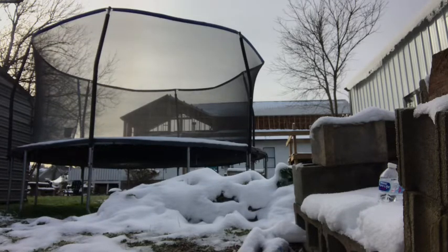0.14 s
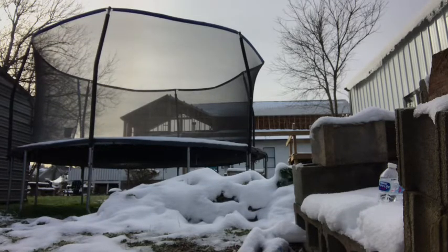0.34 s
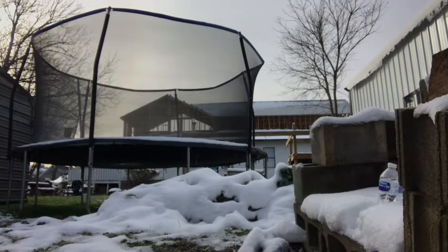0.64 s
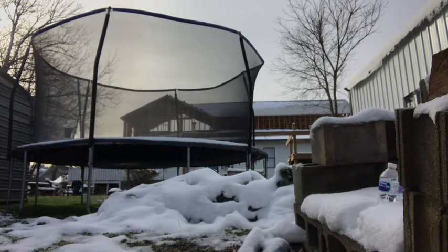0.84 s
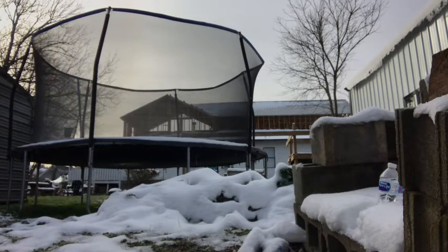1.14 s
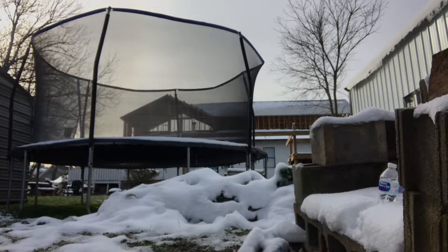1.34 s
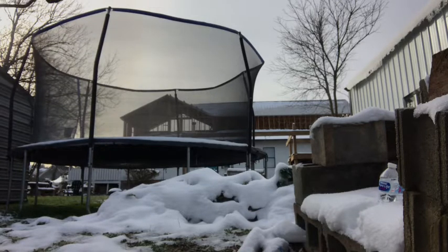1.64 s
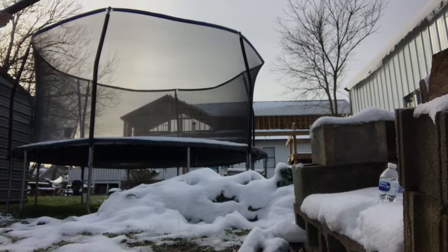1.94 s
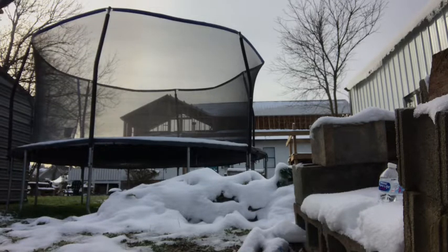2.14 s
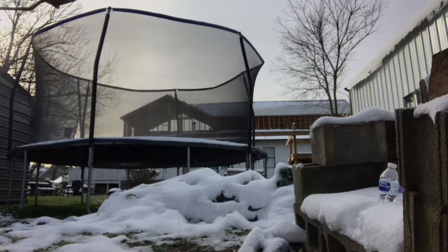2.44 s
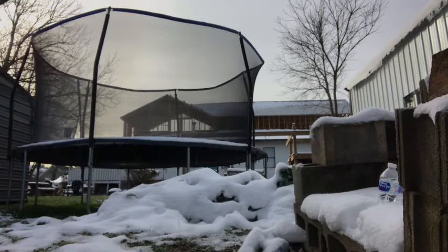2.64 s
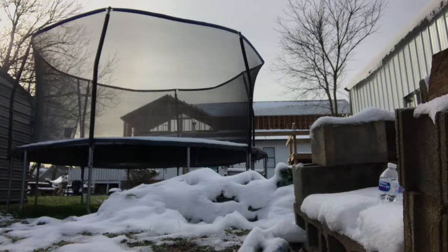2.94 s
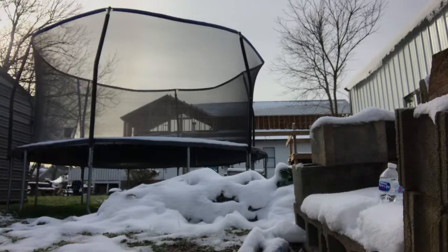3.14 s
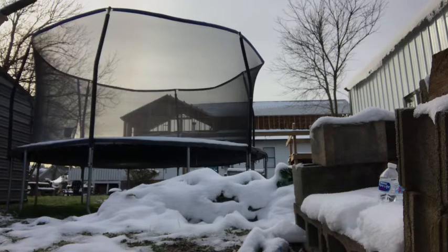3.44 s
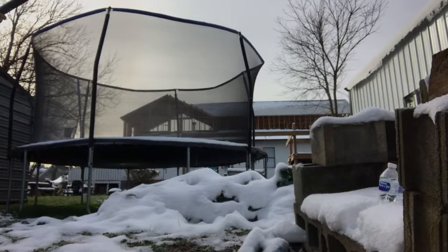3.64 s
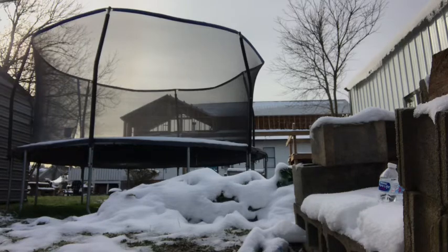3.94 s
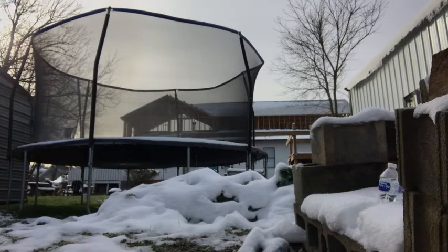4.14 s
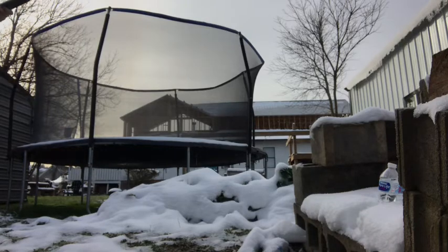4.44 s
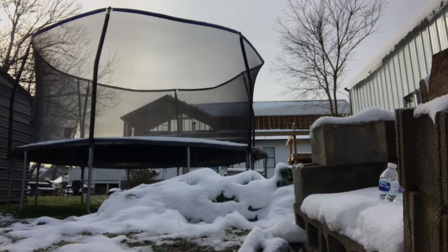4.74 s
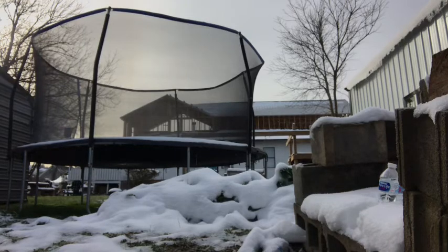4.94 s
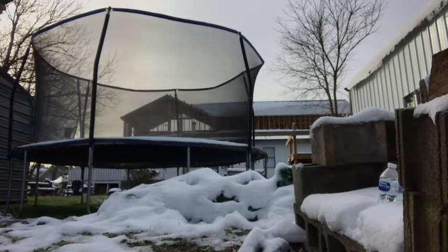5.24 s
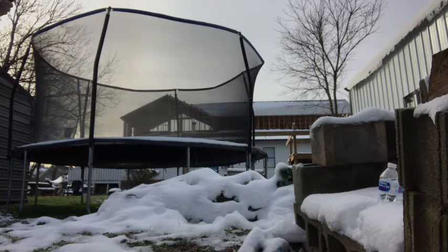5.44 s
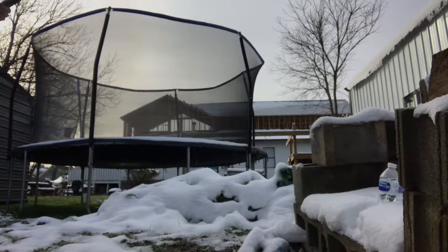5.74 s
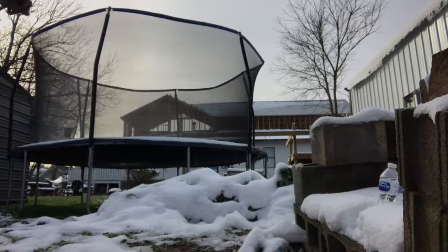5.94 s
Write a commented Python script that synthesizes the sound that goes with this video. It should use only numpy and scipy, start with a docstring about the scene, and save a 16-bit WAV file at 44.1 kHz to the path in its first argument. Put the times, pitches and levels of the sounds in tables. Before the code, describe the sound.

An air rifle is pumped seven times close to the microphone in a quiet back yard. The lever opens with a softer metallic click at about 0.2, 0.9, 1.7, 2.5, 3.2, 4.0 and 5.0 seconds. After each opening, a hand rubs faintly on the stock and the linkage gives a few dry ticks. The lever then slams shut with a sharp clack, the loudest sound, at about 0.5, 1.3, 2.1, 2.9, 3.6, 4.6 and 5.7 seconds, so the last two strokes come more slowly. Just after each clack the gun settles with a dull knock and a quick, light metal rattle. A very faint hiss of air escapes while the lever is shut. The blows leave a short, light echo off nearby sheds and fences. A distant machine hums low and steady throughout, over still outdoor air.

```python
"""A pneumatic air rifle is pumped seven times, close up, in a snowy back yard.
On each stroke the lever unlatches and hits its open stop, the hand rubs and the linkage ticks under
load, the lever slams shut, then the gun knocks and rattles in the hands. Each blow is a short crack
coloured by the part it strikes. Air seeps out while the lever is shut.
Sheds and fences answer, and a far machine hums."""
import sys
import numpy as np
from scipy import signal
from scipy.fft import rfft, irfft, next_fast_len
from scipy.io import wavfile
from scipy.ndimage import uniform_filter1d, map_coordinates

SR = 44100
rng = np.random.default_rng(int(sys.argv[2]) if len(sys.argv) > 2 else 0)


def digitize_waveform(pressure):
    """Quantize a signal to 16-bit integers and store it at the path in sys.argv[1].

    Rows of a 2-D input are taken as channels; values are limited to [-1, 1].
    """
    field = np.atleast_2d(pressure).T
    bounded = np.clip(field, -1, 1)
    quanta = np.round(bounded * 32767).astype(np.int16)
    wavfile.write(sys.argv[1], SR, quanta)


N = 267667

# the lever swings open: start_s, relative_stop_db
OPENINGS = [(0.1631, -18.5), (0.9388, -18), (1.6603, -17), (2.484, -16.5), (3.2495, -18), (4.0348, -17.5),
            (5.036, -18.5)]
# the lever slams shut, with relative levels: graze_s, touch_db, graze_db, home_db, travel_s, treble_db
SLAMS = [(.5370, -9, -8.5, 1.5, .003, 0), (1.281, -6.5, -2.5, 1, .0034, 0.5),
         (2.0840, -7, -11.5, -0.5, .003, -2.5), (2.8623, -11, -5.5, -1.5, .0072, -2),
         (3.6273, -17.5, 0, -0.5, .0044, 0), (4.6283, -15.5, -1, 0, .0042, 3.5),
         (5.6859, -21, -1.5, 0.5, .004, 0.5)]
# colour of a light metal tick: frequency_hz, gain_db
TICK_TONE = [(200, -17.5), (420, -21), (600, -1), (850, 1.5), (1100, -9), (1550, 4), (2000, -7.5),
             (3000, -0.5), (5200, -5.5), (8000, -9.5), (9500, -10), (10700, -12.5), (15500, -15)]


def amp(db):
    """Decibels to gain."""
    return 10 ** (np.asarray(db) / 20)


def unit(x):
    """Scale to rms 1."""
    return x / np.sqrt(np.mean(x ** 2) + 1e-20)


def along(points, hz):
    """Read a curve of (frequency_hz, value) points on a log frequency axis."""
    frequencies, values = np.transpose(points)
    return np.interp(np.log(hz + 1), np.log(frequencies + 1), values)


def add(track, start_s, sound):
    """Mix a sound into the track."""
    part = track[round(start_s * SR):][:len(sound)]
    part += sound[:len(part)]


def filtered(x, gain):
    """Zero-phase EQ, with gain given as a function of frequency."""
    size = next_fast_len(len(x) + 2048)
    return irfft(rfft(x, size) * gain(np.fft.rfftfreq(size, 1 / SR)), size)[:len(x)]


def band(x, centres, index):
    """One band of a crossover, fading out toward the neighbouring centres."""
    shape = np.c_[centres, np.eye(len(centres))[index]]
    return filtered(x, lambda hz: along(shape, hz))


def noise(tone):
    """Steady coloured noise of rms 1."""
    return unit(filtered(rng.standard_normal(N), lambda hz: amp(along(tone, hz))))


def wobble(rate_hz):
    """A smooth random drift."""
    knots = rng.standard_normal(int(N * rate_hz / SR) + 4)
    return map_coordinates(knots, [np.arange(N) * rate_hz / SR])


def body(tone, resonances=(), size=4096):
    """Impulse response of a struck part: a broad colour lifted at its resonances; energy 1."""
    hz = np.fft.rfftfreq(size, 1 / SR)
    peaks_db = sum(lift / (1 + (2 * (hz - centre) / width) ** 2) for centre, width, lift in resonances)
    cepstrum = irfft(np.log(amp(along(tone, hz) + peaks_db)))
    cepstrum[1:size // 2] *= 2  # minimum phase keeps the attack sharp
    cepstrum[size // 2 + 1:] = 0
    response = irfft(np.exp(rfft(cepstrum)))[:size // 2]
    return response / np.linalg.norm(response)


def gun_ring(size):
    """The gun's dense modes blur into noise, each band dying at its own speed; energy 1."""
    # ring time of the gun: frequency_hz, t60_s
    ring_times = [(200, 0.012), (800, 0.049), (1700, 0.05), (4000, 0.032), (12000, 0.035)]
    centres, t60s = np.transpose(ring_times)
    t, white = np.arange(size) / SR, rng.standard_normal(size)
    tail = sum(band(white, centres, k) * amp(-60 * t / t60) for k, t60 in enumerate(t60s))
    return tail / np.linalg.norm(tail)


def contact(response, crack_t60, ring_db, size=4096):
    """One blow: a short crack and the ring of the gun, through the struck part; energy 1."""
    crack = rng.standard_normal(size) * amp(-60 * np.arange(size) / SR / crack_t60)
    spectrum = rfft(crack / np.linalg.norm(crack) + amp(ring_db) * gun_ring(size))
    # a hard blow feeds all bands evenly, so the struck part alone sets the colour
    colour = np.sqrt(np.abs(uniform_filter1d(np.abs(spectrum) ** 2, size=31)))
    blow = irfft(spectrum / colour)[:size // 2]
    sound = signal.fftconvolve(blow, response)
    return sound / np.linalg.norm(sound)


def clink(modes, size=12000):
    """Thin metal rings in damped modes whose pitch and level vary from blow to blow."""
    t, sound = np.arange(size) / SR, np.zeros(size)
    detunes = rng.normal(1, 0.018, len(modes))
    for (hz, db, t60), detune in zip(modes, detunes):
        ring = np.sin(2 * np.pi * hz * detune * t) * amp(-60 * t / t60)
        sound += amp(db + rng.normal(0, 3.5)) * ring / np.linalg.norm(ring)
    return sound


def outdoors(hum_hz=55.5):
    """A far machine hums over a bed of low rumble and still air."""
    # colour of the rumble: frequency_hz, gain_db
    rumble_tone = [(20, -29), (34, -6), (60, -1), (90, 2), (140, -4), (220, -16), (400, -32.5),
                   (1000, -91.5)]
    # colour of the still air: frequency_hz, gain_db
    air_tone = [(88, -30.5), (150, -10.5), (439, -20.5), (589, -17), (702, -19), (2220, -32.5),
                (2400, -30.5), (3350, -35), (3770, -30), (4760, -37), (16000, -46.5)]
    phase = 2 * np.pi * np.cumsum(hum_hz + .12 * wobble(1.7)) / SR
    hum = amp(-41.5 + .4 * wobble(1.2)) * (np.sin(phase) + amp(-26) * np.sin(2 * phase))
    rumble = amp(-60.5) * noise(rumble_tone)
    air = amp(-62.5 + 2 * wobble(4.7)) * noise(air_tone)
    return hum + rumble + air


def seep():
    """Air hisses out faintly whenever the lever is shut."""
    # colour of the escaping air: frequency_hz, gain_db
    hiss_tone = [(500, -16), (1500, 2.5), (3500, 0.5), (7000, -3.5), (10500, -6.5), (14000, -8.5),
                 (16000, -13)]
    t = np.arange(N) / SR
    last_slam = np.max([np.where(t > s, s, 0) for s, *_ in SLAMS], axis=0)
    last_opening = np.max([np.where(t > s, s, 0) for s, _ in OPENINGS], axis=0)
    shut = uniform_filter1d(1. * (last_slam >= last_opening), size=900)
    return amp(-62) * shut * noise(hiss_tone)


def openings(snap_lag_s=.003, pivot_lag_s=.0087, swing_s=.0187):
    """The latch scrapes and lets go with a double snap, the pivot knocks, the lever hits its stop."""
    # colour of the latch: frequency_hz, gain_db
    latch_tone = [(150, -8.5), (330, -16.5), (450, -8), (540, 6), (800, -1), (1150, -2), (2000, -6),
                  (4500, -6), (7500, -16.5), (10500, -29), (15500, -23.5)]
    # colour of the open stop: frequency_hz, gain_db
    stop_tone = [(120, -15.5), (200, -10.5), (330, -18), (450, -11.5), (600, -4.5), (850, 1), (1200, -4.5),
                 (2000, -2), (3000, -6), (4500, -14.5), (7000, -11), (10500, -23), (15500, -24.5)]
    # resonances of the lever: centre_hz, width_hz, lift_db
    lever_resonances = [(680, 360, 6.8), (1333, 160, 5.5), (1780, 260, 10), (2130, 93, 2.3),
                        (2545, 340, 5.8), (3101, 176, 6.7), (4360, 590, 12), (5210, 170, 11),
                        (5880, 87, 5.7), (6930, 260, 5.4)]
    # thin ring of the open lever: pitch_hz, relative_db, t60_s
    lever_modes = [(900, -18, .07), (1748, -22.5, 0.13)]
    track = np.zeros(N)
    scrape, latch, lever = body(TICK_TONE), body(latch_tone), body(stop_tone, lever_resonances)
    for s, db in OPENINGS:
        add(track, s - .008, amp(db - 13) * contact(scrape, crack_t60=0.071, ring_db=-18))
        add(track, s, amp(db + 5) * contact(scrape, crack_t60=0.0147, ring_db=-10))
        add(track, s + snap_lag_s, amp(db + 8) * contact(latch, crack_t60=0.009, ring_db=1.5))
        add(track, s + pivot_lag_s, amp(db + 3) * contact(lever, crack_t60=0.0047, ring_db=1))
        add(track, s + swing_s, amp(db + 15) * contact(lever, crack_t60=0.014, ring_db=-4.5))
        add(track, s + swing_s, amp(db + 11.5) * clink(lever_modes))
    return track


def yard(x, size=22000, bands=6):
    """Echoes scattered by sheds and fences blur each band into dying noise."""
    # reverb time of the yard: frequency_hz, t60_s
    reverb_times = [(200, .3), (800, 0.92), (2000, 0.46), (5000, 0.34), (12000, 0.44)]
    # colour of the reverb: frequency_hz, gain_db
    reverb_tone = [(150, -1.5), (700, -6.5), (1500, 2), (3500, 2), (7000, -2.5), (15000, -2.5)]
    wet, t = np.zeros(N), np.arange(size) / SR
    attack = 1 - np.exp(-t / 0.0052)
    wall_swell = 1 + 0.21 * np.exp(-((t - .072) / 0.013) ** 2)
    centres, white = np.geomspace(400, 13000, bands), rng.standard_normal(N)
    for k, centre in enumerate(centres):
        decay = (attack * wall_swell * amp(-60 * t / along(reverb_times, centre))) ** 2
        power = np.abs(signal.fftconvolve(band(x, centres, k) ** 2, decay / decay.sum())[:N])
        wash = unit(band(white, centres, k) * amp(1.5 * wobble(90)))
        wet += amp(along(reverb_tone, centre)) * np.sqrt(power) * wash
    return wet


def shed_wall(gun, opening, slap_s=.06, slap_db=-37, throw_s=.05):
    """The shed wall returns a faint slap of the gun and throws back the opening lever's midrange."""
    # colour of the lever's late return: frequency_hz, gain_db
    throw_tone = [(900, -10), (1300, -0.5), (1800, -3.5), (2400, -17)]
    slap, throw = np.zeros(N), np.zeros(N)
    add(slap, slap_s, amp(slap_db) * gun)
    add(throw, throw_s, filtered(opening, lambda hz: amp(along(throw_tone, hz))))
    return slap, throw


def rubbing(slips=14, attack_s=.006, t60_s=.05):
    """Hand and linkage slip faintly and unevenly between each opening and the next slam."""
    # colour of the hand rubbing on the stock: frequency_hz, gain_db
    rub_tone = [(200, -16), (450, -8.5), (750, -1), (1200, -1), (1700, -4.5), (2800, -9.5), (5000, -10.5),
                (9500, -16.5), (15000, -26)]
    track, t = np.zeros(N), np.arange(4096) / SR
    envelope = (1 - np.exp(-t / attack_s)) * amp(-60 * t / t60_s)
    for (open_s, _), (shut_s, *_) in zip(OPENINGS, SLAMS):
        for when, strength in rng.random((slips, 2)):
            s = open_s + (shut_s - open_s) * np.sqrt(when)  # denser as the pressure builds
            slip = rng.standard_normal(len(t)) * envelope
            add(track, s, amp(-46.5 + 6.7 * strength) * slip / np.linalg.norm(slip))
    return signal.fftconvolve(track, body(rub_tone))[:N]


def link_tap(dull_db, crack_t60, ring_db, clink_db):
    """Two links touch and clink, anywhere from a dull tap to a bright snap."""
    # thin ring of the linkage: pitch_hz, relative_db, t60_s
    link_modes = [(830, -11.5, 0.049), (1475, -9.5, 0.053), (1670, -11, 0.054), (2410, -12, .035),
                  (3180, -14, .03), (5150, -7, 0.036), (5210, -10, 0.024), (6780, -10, 0.014),
                  (8960, -13.5, 0.014), (10940, -12.5, 0.016)]
    tilt = [(1500, min(dull_db, 0)), (4000, min(-dull_db, 0))]  # dull cuts highs, bright cuts lows
    tone = [(hz, db + along(tilt, hz)) for hz, db in TICK_TONE]
    modes = [(hz, db + along(tilt, hz), t60) for hz, db, t60 in link_modes]
    sound = amp(clink_db) * clink(modes)
    add(sound, 0, contact(body(tone), crack_t60, ring_db))
    return sound


def ticks(faint_count=4, push_delay_s=.18, push_span_s=.12):
    """The loaded linkage ticks dryly, with a few faint random ticks as each push begins."""
    # the clearest ticks of the linkage: start_s, relative_db, dullness_db
    clear_ticks = [(.410, -41.5, -4.5), (.426, -23, 7), (.703, -33, -20), (1.19, -29, 6.5),
                   (1.225, -28.5, -10.5), (1.877, -40, 1), (1.92, -38.5, 9), (2.03, -39.5, 0),
                   (2.731, -30, -8.5), (2.78, -31, -4), (3.504, -34.5, -2.5), (3.575, -33, -6.5),
                   (4.303, -33.5, -11.5), (4.321, -32.5, -5.5), (4.412, -32, -2.5), (5.284, -32, -6),
                   (5.305, -32, -7), (5.415, -32, -16), (5.964, -25, -10.5)]
    track, faint_ticks = np.zeros(N), []
    for s, _ in OPENINGS:
        for when, strength in rng.random((faint_count, 2)):
            faint_ticks.append((s + push_delay_s + push_span_s * when, -50.5 + 5.5 * strength, 0))
    for s, db, dull_db in list(clear_ticks) + faint_ticks:
        add(track, s, amp(db + 11.5) * link_tap(dull_db, crack_t60=0.0086, ring_db=-3.5, clink_db=-3.5))
    return track


def slams(touch_lead_s=.002, rebound_s=.002, rebound_db=-4):
    """After a faint scuff the lever touches and grazes the stock, is driven home and rebounds once."""
    # colour of the slam: frequency_hz, gain_db
    slam_tone = [(120, -31.5), (200, -11.5), (330, -16.5), (450, -14.5), (600, -1), (850, 0.2), (1200, 0),
                 (2000, -1.5), (3000, 2), (4500, -1.5), (7000, -4.5), (10500, -12), (15500, -17)]
    # resonances of the stock and barrel: centre_hz, width_hz, lift_db
    stock_resonances = [(805, 230, 8), (987, 72, 6.5), (1360, 150, 4), (1674, 50, 4), (2366, 170, 4.5),
                        (2970, 320, 5.5), (4010, 310, 5), (4740, 260, 7), (7090, 410, 5.5), (9656, 350, 7),
                        (11300, 1200, 4.5), (13240, 210, 8)]
    track = np.zeros(N)
    for s, touch_db, graze_db, home_db, travel_s, treble_db in SLAMS:
        resonances = list(stock_resonances) + [(7000, 4000, treble_db)]
        struck = body(slam_tone, resonances)
        grazed = body(slam_tone, resonances + [(4000, 2000, 2)])  # a harder edge
        blows = [(s - touch_lead_s, touch_db, grazed),
                 (s, graze_db, grazed),
                 (s + travel_s, home_db, struck),
                 (s + travel_s + rebound_s, home_db + rebound_db, struck)]
        for when, db, stock in blows:
            add(track, when, amp(db + 13.5) * contact(stock, crack_t60=0.0098, ring_db=-7))
        scuff = contact(body(slam_tone), crack_t60=0.033, ring_db=-4)
        add(track, s - .02, amp(-28) * scuff)
    return track


def knocks():
    """After each slam the gun settles in the hands with a dull knock."""
    # knocks in the hands: start_s, relative_db
    hits = [(0.658, -23.5), (1.389, -23), (2.22, -23), (2.982, -21.5), (3.761, -22), (4.764, -22.5),
            (5.84, -26)]
    # colour of the gripped gun: frequency_hz, gain_db
    knock_tone = [(150, -21), (420, -20.5), (630, 0.5), (970, 4.5), (1150, -8), (1400, -1), (1750, -15.5),
                  (2200, 2.5), (2700, -7.5), (4000, -9), (7000, -19.5), (15500, -30.5)]
    track, grip = np.zeros(N), body(knock_tone)
    for s, db in hits:
        add(track, s, amp(db + 16) * contact(grip, crack_t60=0.016, ring_db=-4.5))
    return track


def rattles(count=4, touch_lead_s=.01):
    """After each knock a loose part rocks from seat to seat, clinking and fading ever faster."""
    # bursts of rattle: start_s, relative_db, gap_s, first_fade_db
    bursts = [(.718, -30.5, .028, -5), (1.446, -32.5, .021, -2.5), (2.274, -33.5, 0.021, -1.5),
              (3.036, -31.5, 0.023, -2.5), (3.816, -31.5, .026, -3), (4.812, -27.5, 0.023, -3),
              (5.897, -24.5, 0.022, -4.5)]
    # the part's two seats, one bright and one dull: dullness_db, lift_db
    seats = [(-0.5, 1), (10.5, 5.5)]
    track = np.zeros(N)
    for s, burst_db, gap_s, fade_db in bursts:
        bumps = [(s - touch_lead_s, burst_db - 6.5, -3)]  # a light, bright touch leads
        for k in range(count):
            dull_db, seat_db = seats[k % 2]
            bumps.append((s + k * gap_s, burst_db + seat_db + fade_db * k * (k + 1) / 2, dull_db))
        for when, db, dull_db in bumps:
            add(track, when, amp(db + 13.5) * link_tap(dull_db, crack_t60=0.032, ring_db=-2, clink_db=-1))
    return track


def scene():
    """The gun up close, its echoes behind it and the outdoor bed, in mono."""
    opening = openings()
    gun = opening + rubbing() + ticks() + slams() + knocks() + rattles()
    slap, throw = shed_wall(gun, opening)
    reverb = amp(-23.5) * yard(gun + throw)
    return (gun + slap + reverb + seep() + outdoors())[None]


def record(dry):
    """The microphone port colours the treble, loud peaks are rounded off, and the top ends steeply."""
    # colour of the microphone port: frequency_hz, gain_db
    port_tone = [(5000, -0.5), (7200, 0.5), (8400, -0.5), (9600, 2), (10600, -5), (11800, 1), (15000, -1.5)]
    cutoff_hz = 16100
    coloured = filtered(dry[0], lambda hz: amp(along(port_tone, hz)))
    rounded = coloured / (1 + np.abs(coloured) ** 4) ** (1 / 4)
    return filtered(rounded, lambda hz: 1 / np.sqrt(1 + (hz / cutoff_hz) ** 160))[None]


dry = scene()
out = record(dry)
digitize_waveform(out)
```